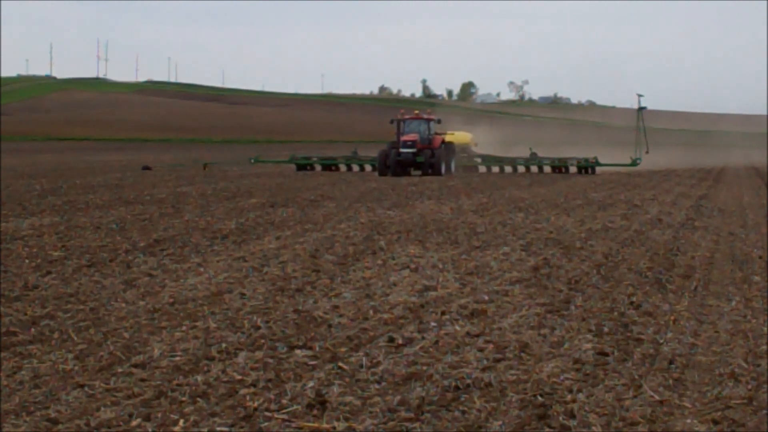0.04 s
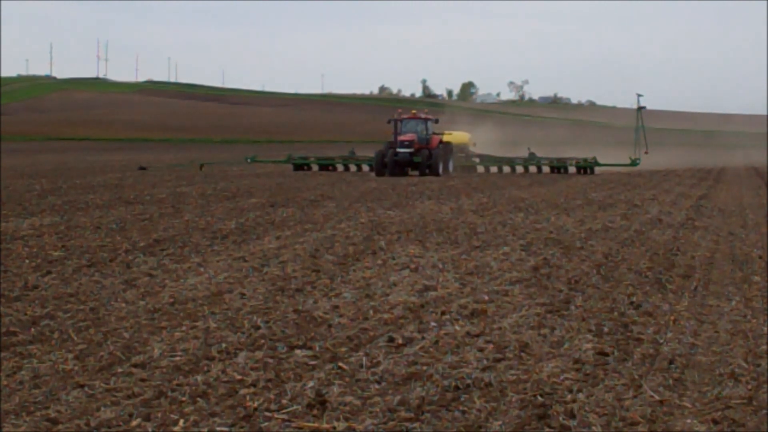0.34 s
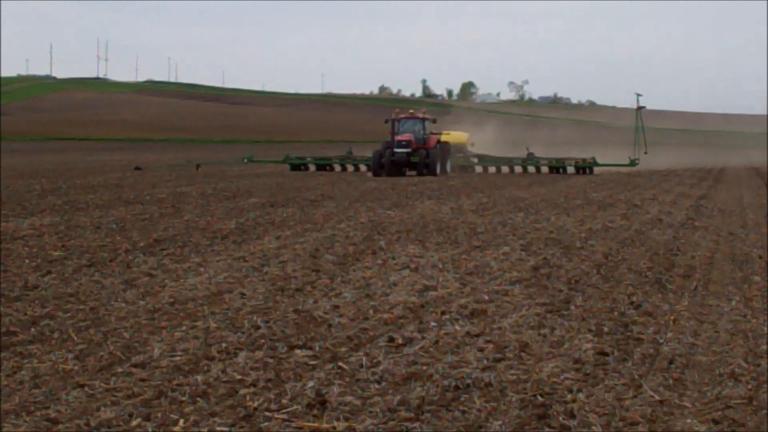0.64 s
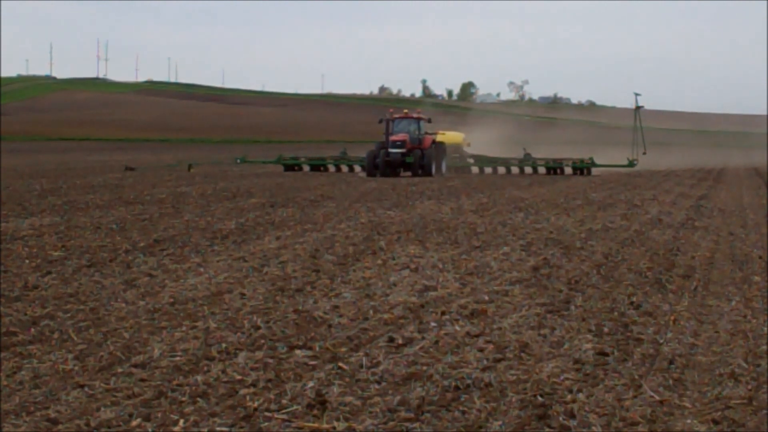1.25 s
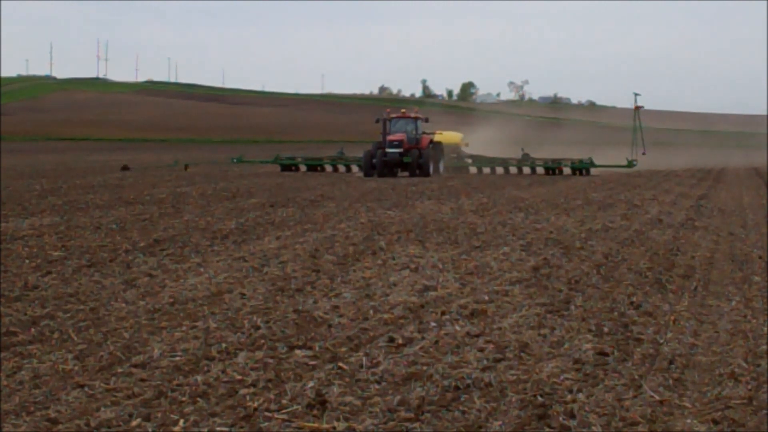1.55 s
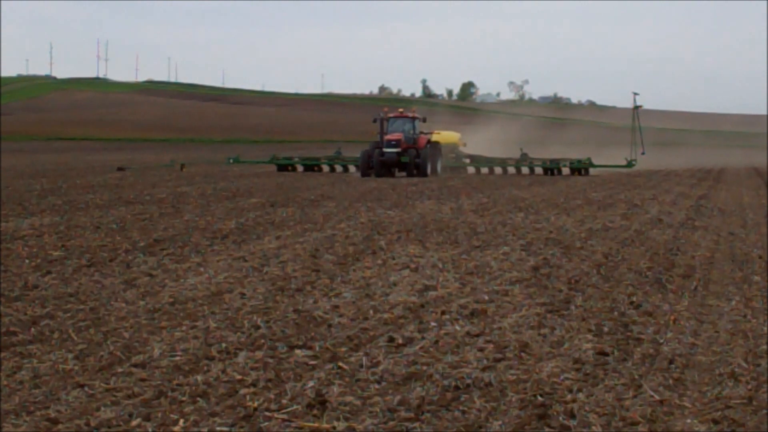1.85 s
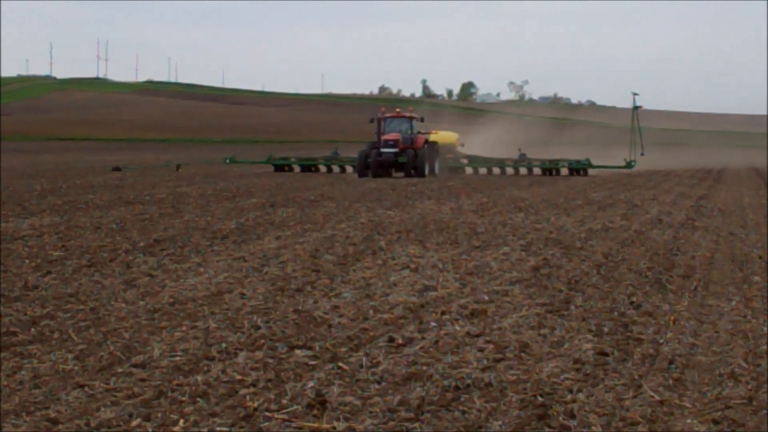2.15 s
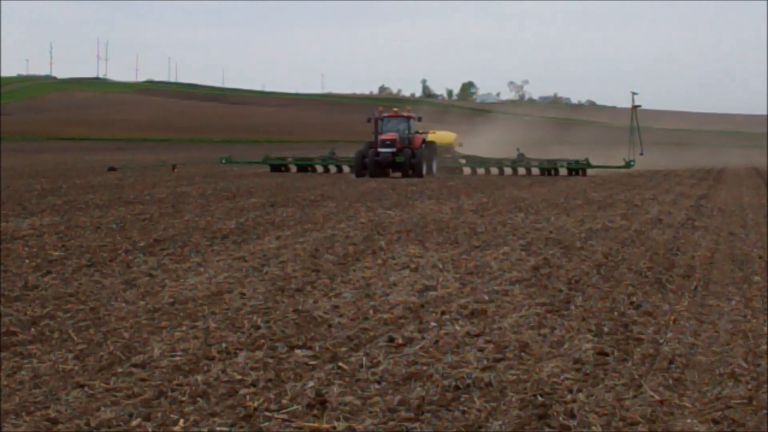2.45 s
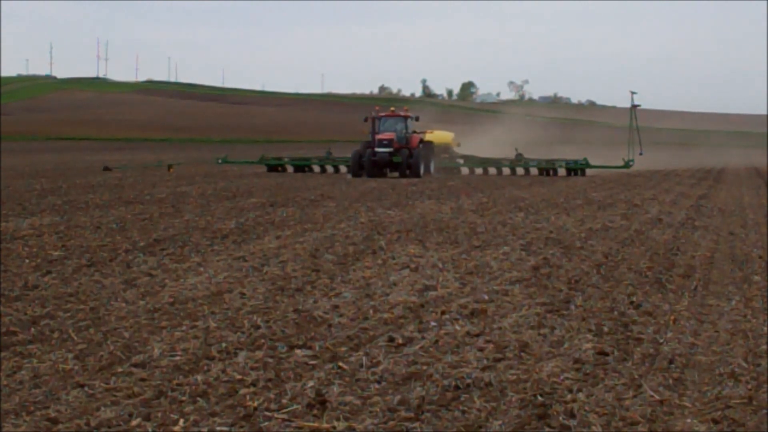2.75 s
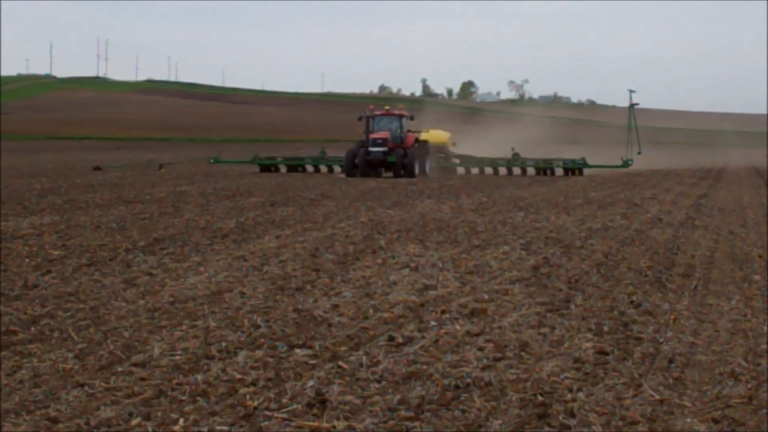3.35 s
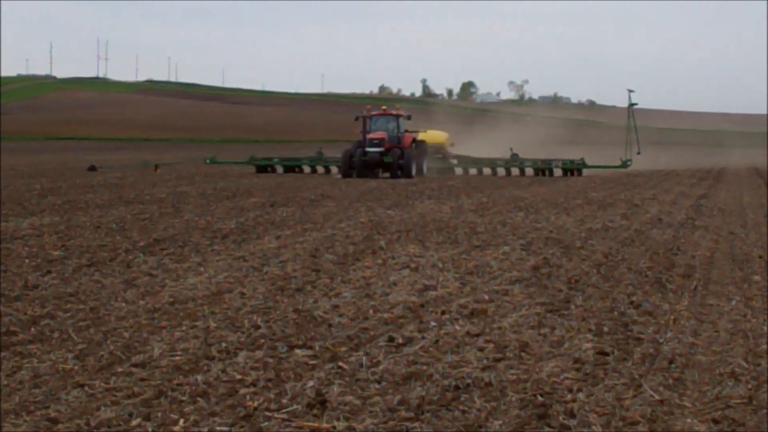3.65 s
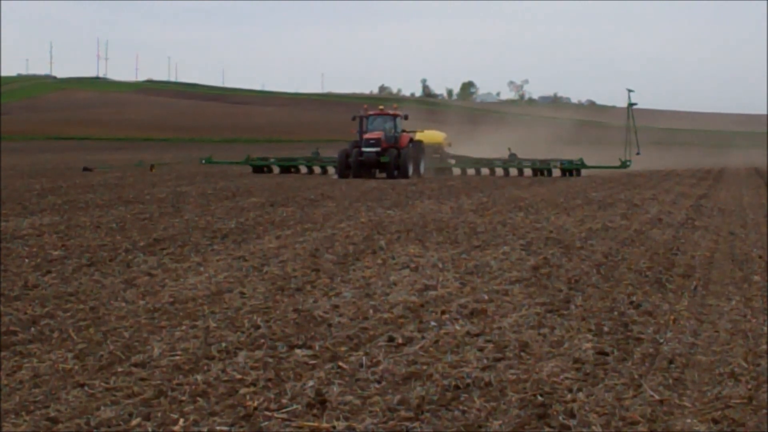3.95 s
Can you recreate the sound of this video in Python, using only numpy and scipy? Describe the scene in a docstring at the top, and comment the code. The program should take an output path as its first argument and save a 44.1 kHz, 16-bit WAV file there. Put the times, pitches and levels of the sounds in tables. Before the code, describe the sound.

A diesel tractor drones and clatters steadily at a distance, pulling a hissing planter.

```python
"""An open field: some way off, a six-cylinder diesel tractor pulls a planter at steady speed.
Each firing knocks in the engine block, over an exhaust hum, gear whines, fan roar and a thin turbo
whistle. The planter hisses through dry soil, and moving air makes the treble drift.
Up close there are two faint ticks, and late on a few gusts bump the microphone."""
import sys
import numpy as np
from scipy import signal
from scipy.fft import rfft, irfft
from scipy.io import wavfile

SR = 44100
rng = np.random.default_rng(int(sys.argv[2]) if len(sys.argv) > 2 else 0)


def materialize(psi):
    """Save the field psi as 16-bit PCM at rate SR to the path in sys.argv[1].

    A 1-D psi becomes a single channel; in a 2-D psi each row is a channel.
    """
    bounded = np.clip(np.atleast_2d(psi).T, -1, 1)
    quanta = np.round(bounded * 32767).astype(np.int16)
    wavfile.write(sys.argv[1], SR, quanta)


N = 176400
T = np.arange(N) / SR
HZ = np.fft.rfftfreq(N, 1 / SR)

# Stereo width of the noise, narrow in the mids: freq_hz, correlation
STEREO_LIKENESS = [(60, .85), (130, .8), (290, .92), (620, .98), (2400, .97), (4200, .87), (6400, .76),
                   (9000, .4), (14000, .1)]
# The tractor's lean to the right: freq_hz, left_minus_right_db
PAN = [(60, -3.5), (130, -8), (370, -7.5), (1200, -6.5), (2300, -6), (4200, -5), (7600, -5), (14000, -10)]
# Dry ticks close by: start_s, level_db
TICKS = [(.2078, -35.5), (3.3277, -38.5)]
# Their bright colour: freq_hz, gain_db
TICK_EQ = [(1000, -30), (5000, -10), (11000, 0)]
# Eddies on the microphone: centre_s, peak_db, half_width_s, thump_hz
GUSTS = [(3.2037, -32, .009, 140), (3.2368, -26.3, .0045, 180), (3.414, -38, .019, 110),
         (3.455, -24.7, .005, 335), (3.4625, -29.5, .007, 135), (3.609, -38, .0051, 200),
         (3.648, -37, .01, 100), (3.719, -39, .0058, 170), (3.8207, -27.3, .005, 310),
         (3.844, -34.5, .019, 275)]
# Their rumble: freq_hz, gain_db
GUST_EQ = [(20, -23), (70, -7.5), (170, 0.5), (300, -9), (450, -7.5), (800, -26), (3000, -58)]
# Hiss of the planter in the soil: freq_hz, gain_db
SOIL_EQ = [(1000, -24), (2600, 1), (3500, 0.5), (5000, -2.5), (6500, -0.5), (7500, -5.5), (9000, -13),
           (14000, -19)]
# The three hiss bands that swell: centre_hz
SWELL_HZ = [4250, 6250, 7800]
# Their slow swells in the moving air: time_s, low_band_db, mid_band_db, high_band_db
SWELLS = [(0, 0.5, -0.5, -2), (.35, 4.5, 0.5, 0.5), (.65, 3.5, -3, -2.5), (.85, 1, -4.5, -3),
          (1.05, -0.5, -0.5, -3), (1.3, -1, 2, 2.5), (1.58, 0, -4, -4), (1.75, -1, 2, -4),
          (1.92, 3, 1.5, -2), (2.1, 1.5, -6.5, -3), (2.4, 1.5, -0.5, -1), (2.65, 0, -4.5, -9),
          (2.87, -5.5, -3, -6), (3.1, 1, -1, -2), (3.4, -2, -3.5, -6), (3.7, 1, -4.5, -8), (4, -1, -11, -5)]
# Early colour of the fan and engine casing: freq_hz, gain_db
ROAR_EARLY_EQ = [(20, -32), (50, -12), (90, -9), (135, -1), (205, -18.5), (280, -16), (350, -7.5),
                 (440, -0.5), (520, 3.5), (580, -2.5), (690, -0.5), (745, 3), (790, 2.5), (950, -0.5),
                 (1050, -9), (1170, 7), (1220, 5.5), (1360, -6.5), (1600, 0), (2900, -7), (4000, -16),
                 (8000, -40)]
# Their late colour: freq_hz, gain_db
ROAR_LATE_EQ = [(20, -21), (90, -6), (135, -0.5), (220, -18.5), (340, -4), (520, 1.5), (590, -2), (660, 5),
                (745, 8), (890, -4), (1000, 3.5), (1160, 5), (1280, -1.5), (1550, 0), (2900, -4.5),
                (8000, -32)]
# Fader ride on the roar, before its trim: time_s, level_db
ROAR_FADER = [(0, -43), (.8, -44.5), (1.6, -45.5), (2, -45), (2.6, -46.5), (3.3, -48), (4, -48)]
# Fader ride on the turbo whistle: time_s, level_db
TURBO_FADER = [(0, -66), (.12, -63), (.38, -70), (.6, -62), (1.12, -76), (1.29, -62.5), (1.5, -78),
               (1.75, -76), (1.9, -65), (2.15, -69), (2.48, -65.5), (2.7, -71), (3.65, -66.5), (4, -69)]
# The whistle's slight climb: time_s, pitch_hz
TURBO_PITCH = [(0, 11770), (2, 11775), (2.6, 11815), (4, 11850)]
# Gear and pump whines: pitch_hz, midway_level_db, slope_db_per_s, phase_wander_rad
WHINES = [(517, -55.7, -1, .42), (744, -58.8, 0, .5), (1175, -65, -3, 1), (2026, -53.7, -.7, .4),
          (3039, -69, 0, .4), (3715, -67.5, 0, .3), (4053, -66.3, -1, .3), (4790, -65.3, -.7, .2),
          (7185, -74.5, 0, .3)]
# Partials of the exhaust hum: multiple_of_cycle_rate, midway_level_db
EXHAUST_ORDERS = [(6, -55.5), (7, -64.5), (9, -68), (12, -71.5), (32, -62)]
# Engine speed: time_s, firings_per_s
FIRING_RATE = [(0, 82.85), (1.3, 82.78), (1.9, 82.58), (4, 82.6)]
# Each cylinder's own knock: strength_db, late_s
CYLINDERS = [(.3, .0005), (-.2, -.0004), (0, .0001), (0, -.0001), (.8, .0005), (-.9, -.0006)]
# Ring of the engine block: freq_hz, gain_db
BLOCK_EQ = [(300, -38.5), (1400, -35.5), (1700, -12.5), (1840, -2), (1920, -19), (2020, 2), (2090, -8),
            (2140, 3), (2220, 2.5), (2290, -3), (2460, -1.5), (2560, -19), (2780, -14), (2900, -5.5),
            (3130, -30), (6000, -26), (12000, -65)]
# Fader ride on the steady knock, before its trim: time_s, level_db
KNOCK_FADER = [(0, -36.6), (.55, -36.6), (.9, -38), (1.3, -37.8), (1.5, -39.6), (2.1, -38.2), (2.52, -36.6),
               (2.95, -40.5), (3.3, -40), (4, -44)]
# Single harder knocks: start_s, peak_db
HARD_KNOCKS = [(.042, -29), (.0515, -25), (.065, -28), (.402, -26), (.584, -29), (.6445, -22.5),
               (.9572, -25.5), (1.0904, -29), (1.388, -29), (2.1051, -26.5), (2.5311, -26), (2.579, -28),
               (2.9412, -24.5), (2.9911, -29), (3.5229, -30.5), (3.5495, -29.5), (3.8145, -30)]


def amp(db):
    """Decibels to gain."""
    return 10 ** (np.asarray(db) / 20)


def unit(x):
    """Scales to rms 1."""
    return x / np.sqrt(np.mean(x ** 2) + 1e-20)


def curve(points, column=1):
    """An automation curve at every sample."""
    rows = np.array(points)
    return np.interp(T, rows[:, 0], rows[:, column])


def spectrum(points):
    """A table spread over every frequency, on a log axis."""
    hz, value = np.transpose(points)
    return np.interp(np.log(HZ + 1), np.log(hz + 1), value)


def colour(x, eq):
    """Minimum-phase EQ, so the ring follows the hit; rms 1."""
    log_gain = np.log(amp(spectrum(eq)))
    phase = -signal.hilbert(np.r_[log_gain, log_gain[-2:0:-1]]).imag[:len(HZ)]
    return unit(irfft(rfft(x) * np.exp(log_gain + 1j * phase), N))


def drift(rate_hz):
    """Slow random motion, rms 1."""
    lowpass = (HZ > 0) / (1 + (HZ / rate_hz) ** 4)
    return unit(irfft(rfft(rng.standard_normal(N)) * lowpass, N))


def stereo_noise():
    """White noise, partly shared by the two microphones."""
    a, b = rfft(rng.standard_normal((2, N)))
    likeness = np.clip(spectrum(STEREO_LIKENESS), 0, 1)
    mid, side = a * np.sqrt((1 + likeness) / 2), b * np.sqrt((1 - likeness) / 2)
    return irfft(np.array([mid + side, mid - side]), N)


def throbbing_noise(firings, depth):
    """Stereo noise that pulses once per firing."""
    return stereo_noise() * (1 - depth * np.cos(2 * np.pi * firings))


def strike(age):
    """Hit envelope: a quick rise to 1 at age 1, then an exponential tail."""
    age = np.maximum(age, 0)
    return age * np.exp(1 - age)


def tone(turns, waver_db, wander_rad, rate_hz):
    """A sine of rms 1 that wavers in level and phase on its way through the air."""
    level = amp(waver_db * drift(rate_hz))
    return unit(level * np.sin(2 * np.pi * (turns + rng.random()) + wander_rad * drift(rate_hz)))


def ticks(rise_s=0.00026):
    """Tiny bright ticks, hard right."""
    envelope = sum(amp(db) * strike((T - start) / rise_s) for start, db in TICKS)
    return np.array([np.zeros(N), colour(rng.standard_normal(N), TICK_EQ) * envelope])


def wind(rumble_db=-9, left_db=-19, thump_cycles=.55):
    """Each eddy is one brief suction inside a puff of rumble, mostly on the right microphone."""
    swell = thumps = 0
    for centre, db, half_width, hz in GUSTS:
        age = T - centre
        swell += amp(db) / (1 + (age / half_width) ** 2)
        thumps -= amp(db) * np.cos(2 * np.pi * hz * age) * np.exp(-(age * hz / thump_cycles) ** 2 / 2)
    rumble = colour(rng.standard_normal((2, N)), GUST_EQ) * swell
    return (rumble * amp(rumble_db) + thumps) * amp([[left_db], [0]])


def soil_hiss(firings, level_db=-46, flutter_db=.8, fizz_hz=9800, fizz_db_per_s=-0.9):
    """Soil and machinery hiss; moving air swells and flutters each band while the top fizz fades."""
    hiss = rfft(colour(throbbing_noise(firings, depth=0.045), SOIL_EQ))
    centres = SWELL_HZ + [fizz_hz]
    rides_db = [curve(SWELLS, column=k + 1) for k in range(len(SWELL_HZ))]
    rides_db.append(fizz_db_per_s * (T - T.mean()))
    mix = 0
    for solo, ride_db in zip(np.eye(len(centres)), rides_db):
        band = irfft(hiss * np.interp(HZ, centres, solo), N)
        mix += band * amp(level_db + ride_db + flutter_db * drift(rate_hz=6))
    return mix


def fan_roar(firings, crossfade_at_s=2.48, crossfade_s=0.21, trim_db=4):
    """Fan and casing noise throbs with the firings and changes colour as the tractor moves on."""
    noise = throbbing_noise(firings, depth=0.034)
    late = (1 + np.tanh((T - crossfade_at_s) / crossfade_s)) / 2
    roar = (1 - late) * colour(noise, ROAR_EARLY_EQ) + late * colour(noise, ROAR_LATE_EQ)
    return roar * amp(curve(ROAR_FADER) + trim_db)


def turbo_whistle(width_hz=45):
    """A thin, fuzzy whistle: a narrow band of noise that glides up and fades in and out."""
    pitch = curve(TURBO_PITCH)
    resonance = 1 / (1 + (2 * (HZ[:N // 2] - pitch.mean()) / width_hz) ** 2)
    band = np.fft.ifft(rfft(stereo_noise())[:, :N // 2] * resonance, N)
    glide = np.exp(2j * np.pi * np.cumsum(pitch - pitch.mean()) / SR)
    return unit((band * glide).real) * amp(curve(TURBO_FADER))


def gear_whine(firings):
    """Gears and pump sing at pitches locked to the engine speed."""
    engine_time = firings / curve(FIRING_RATE).mean()
    return sum(amp(db + slope * (T - T.mean()))
               * tone(hz * engine_time, waver_db=2.4, wander_rad=wander, rate_hz=8.2)
               for hz, db, slope, wander in WHINES)


def exhaust_hum(firings, fade_db_per_s=-1.5):
    """The low end: harmonics of the six-firing engine cycle, slowly fading."""
    cycles = firings / len(CYLINDERS)
    hum = sum(amp(db) * tone(order * cycles, waver_db=1.0, wander_rad=0.092, rate_hz=11.0)
              for order, db in EXHAUST_ORDERS)
    return hum * amp(fade_db_per_s * (T - T.mean()))


def block_knock(firings, scatter_db=.6, jitter_s=.0007, rattle_s=0.002, rattle_floor=.24,
                slap_gain=0.48, trim_db=-1.5):
    """Each firing slaps the block inside a short swell of rattle, each cylinder a bit early or late."""
    index = firings.astype(int)
    scatter, jitter = rng.standard_normal((index.max() + 1, 2)).T
    cylinder_db, late_s = np.array(CYLINDERS)[index % len(CYLINDERS)].T
    strength = amp(cylinder_db + scatter_db * scatter[index])
    age = (firings % 1 - .5) / curve(FIRING_RATE) - late_s
    onsets = np.diff(np.sign(age - jitter_s * jitter[index]), prepend=1) > 0  # one click per firing
    slaps = unit(strength * onsets)
    swell = strength * np.exp(-(age / rattle_s) ** 2 / 2)
    rattle = unit(stereo_noise() * np.hypot(swell, rattle_floor))
    return colour(slap_gain * slaps + rattle, BLOCK_EQ) * amp(curve(KNOCK_FADER) + trim_db)


def diesel_knock(firings, ping_hz=2233, rise_s=0.0014):
    """The block's steady clatter, ducked under a few harder knocks that ping in its place."""
    pings = duck = 0
    for start, db in HARD_KNOCKS:
        age = T - start
        pings += amp(db) * strike(age / rise_s) * np.sin(2 * np.pi * ping_hz * age)
        duck += np.exp(-((age - rise_s) / (2 * rise_s)) ** 2 / 2)
    return block_knock(firings) / (1 + duck) + pings


def scene():
    """The tractor sits to the right, with wind and ticks at the microphone."""
    firings = 1.12 + np.cumsum(curve(FIRING_RATE)) / SR  # running count: the engine's clock
    tractor = (diesel_knock(firings) + exhaust_hum(firings) + gear_whine(firings)
               + fan_roar(firings) + soil_hiss(firings) + turbo_whistle())
    left_to_right = amp(spectrum(PAN))
    right = 2 / (1 + left_to_right)
    panned = irfft(rfft(tractor) * np.array([left_to_right * right, right]), N)
    return panned + wind() + ticks()


def record(dry, cutoff_hz=14280):
    """A steep low-pass takes off the very top."""
    lowpass = signal.firwin(801, cutoff_hz, window=("kaiser", 9), fs=SR)
    return signal.oaconvolve(dry, lowpass[None], "same")


dry = scene()
out = record(dry)
materialize(out)
```